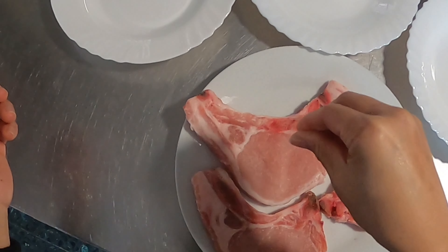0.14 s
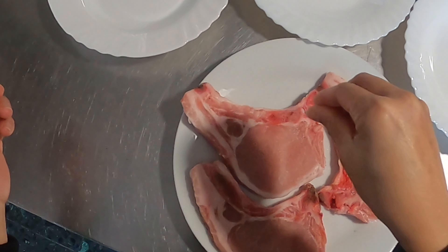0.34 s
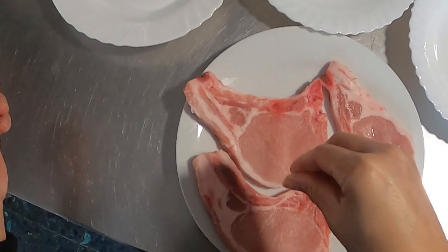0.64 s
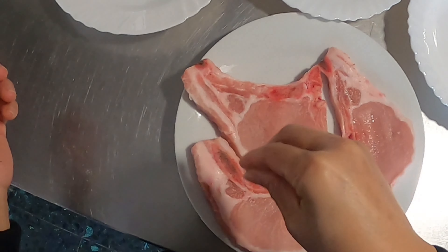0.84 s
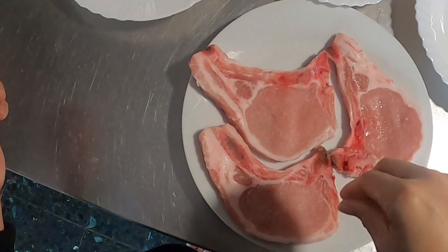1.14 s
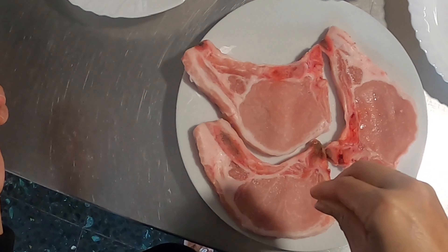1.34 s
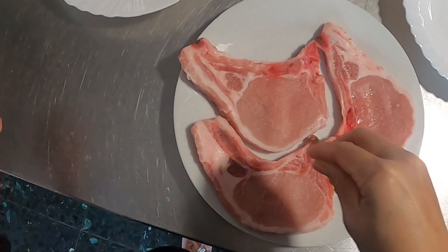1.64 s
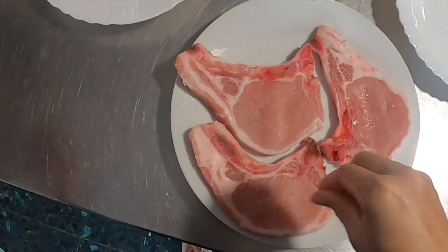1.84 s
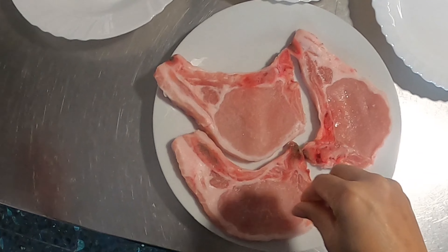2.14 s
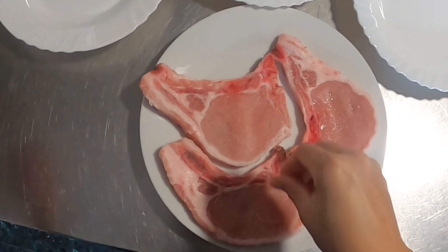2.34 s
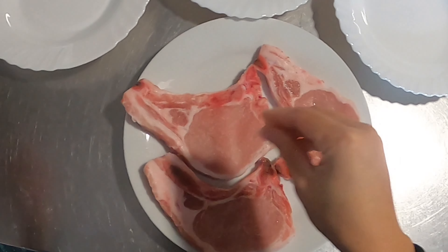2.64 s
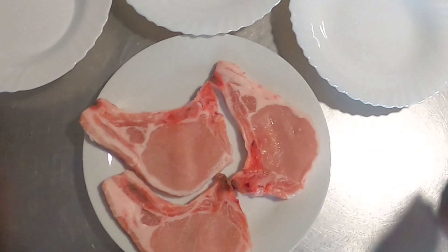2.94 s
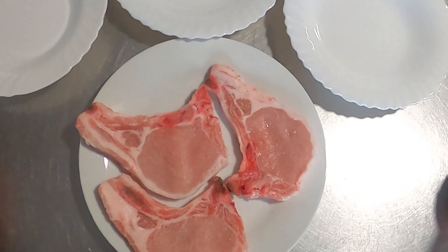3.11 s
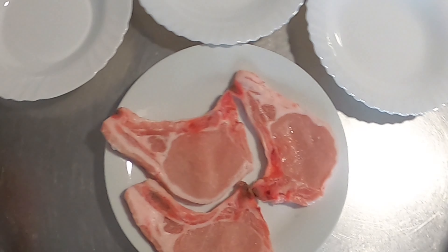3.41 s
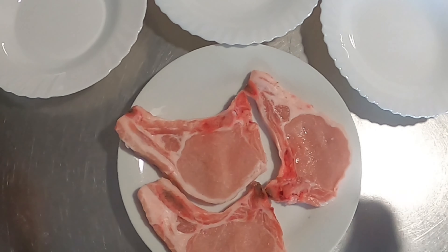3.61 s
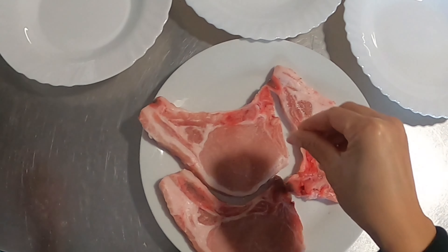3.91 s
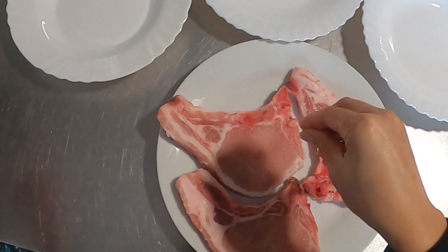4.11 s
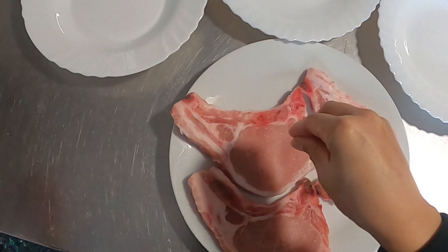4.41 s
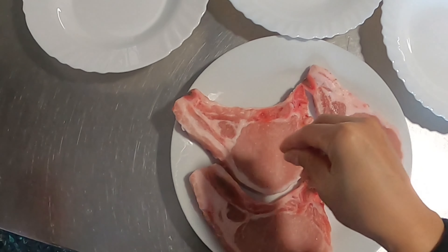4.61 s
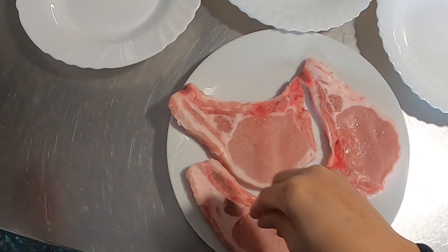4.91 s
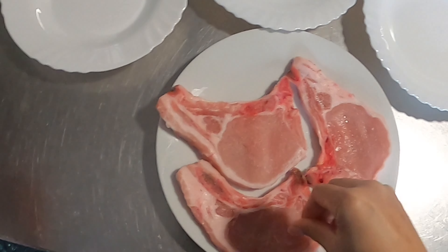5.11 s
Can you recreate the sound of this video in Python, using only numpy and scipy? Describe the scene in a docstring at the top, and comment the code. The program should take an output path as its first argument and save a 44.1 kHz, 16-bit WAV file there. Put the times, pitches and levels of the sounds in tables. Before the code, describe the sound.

A steady kitchen hiss and a low appliance hum, throbbing slowly, run throughout. From the very start, close to the microphone and slightly to the right, fingertips rub a pinch of salt over raw meat, about seven soft strokes a second. The crystals rasp on skin and fizz finely, with a few tiny sharp snaps in the first second. The strokes grow fainter and stop at about 3 seconds. At around 3.4 seconds a small metal thing clinks and chatters farther off, and something hollow is knocked down on a counter with a slight bounce. This knock is the loudest sound, and both echo briefly off the hard walls. Faint clinks continue until about 3.7 seconds. Near 3.9 seconds the salt rubbing resumes at the same pace, with a few snaps around 4.3 seconds, and softens toward the end at about 5.3 seconds.

```python
"""Kitchen hiss and a throbbing appliance hum, and at once, close to the microphone pair, fingertips
rubbing a pinch of salt over raw meat, seven strokes a second: crystals rasp on skin, fizz and snap.
While the hand is away, a small metal thing clinks and something hollow is knocked down on a counter,
both echoing off the hard walls. Then the rubbing resumes."""
import sys
import numpy as np
from scipy import signal
from scipy.fft import rfft, irfft
from scipy.io import wavfile
from scipy.ndimage import uniform_filter1d

SR = 44100
rng = np.random.default_rng(int(sys.argv[2]) if len(sys.argv) > 2 else 0)


def log_audio(samples):
    """Write samples as a 16-bit WAV file to the path given in sys.argv[1]."""
    # one column per channel
    frames = np.atleast_2d(samples).T
    # limit to full scale, then quantise
    limited = np.clip(frames, -1, 1)
    pcm = np.round(limited * 32767).astype(np.int16)
    wavfile.write(sys.argv[1], SR, pcm)


N = 231745


def gain_of(db):
    return 10 ** (np.asarray(db) / 20)


def unit_rms(x):
    return x / np.sqrt(np.mean(x ** 2) + 1e-20)


def curve_at(points, hz):
    """Reads (Hz, value) points along a log frequency axis."""
    freqs, values = np.transpose(points)
    return np.interp(np.log(hz + 1), np.log(freqs + 1), values)


def add(mix, start_s, sound):
    part = mix[..., round(start_s * SR):][..., :sound.shape[-1]]
    part += sound[..., :part.shape[-1]]


def colour(x, points):
    """Shapes the spectrum by (Hz, dB) points."""
    size = x.shape[-1]
    return irfft(rfft(x) * gain_of(curve_at(points, np.fft.rfftfreq(size, 1 / SR))), size)


def resonate(x, hz, width_hz):
    """A resonance that can glide: shifts hz down to zero, smooths, and shifts back."""
    turn = np.exp(2j * np.pi * np.cumsum(hz * np.ones(len(x))) / SR)
    pole = np.exp(-np.pi * width_hz / SR)
    return 2 * (turn * signal.lfilter([1 - pole], [1, -pole], x / turn)).real


def ring(modes, seconds):
    """Dying sines of a struck body; neighbouring modes start in opposite directions."""
    t = np.arange(round(seconds * SR)) / SR
    return sum((-1) ** k * gain_of(db - 60 * t / t60) * np.sin(2 * np.pi * hz * t)
               for k, (hz, db, t60) in enumerate(modes))


# How alike the room sounds at the two microphones: (frequency [Hz], correlation [0-1])
LIKENESS = [(60, 0.98), (200, 0.91), (700, 0.65), (1300, 0.47), (2400, 0.99), (4400, 0.51), (8000, 0.017)]
def mic_pair(a, b):
    """Two unrelated signals become left and right, alike in the bass, unrelated in the top treble."""
    same = np.clip(curve_at(LIKENESS, np.fft.rfftfreq(len(a), 1 / SR)), -1, 1)
    right = irfft(same * rfft(a) + np.sqrt(1 - same ** 2) * rfft(b), len(a))
    return np.array([a, right])


# Room tone all around the microphones, low and high: (frequency [Hz], relative density [dB])
RUMBLE = [(20, -2), (40, -4), (80, -10), (130, -4), (190, -7), (290, 0), (450, -9), (650, -14), (800, -35),
          (1200, -100)]
HISS = [(440, -32), (750, -4), (950, -5), (1300, 0), (1700, -3), (2400, -11.5), (3500, -13), (4800, -16),
        (5800, -16), (8000, -24), (10000, -31), (13000, -39), (15800, -48)]
def room_tone(spectrum, db):
    """Steady room noise whose spectrum drifts in faint patches."""
    hz, _, bands = signal.stft(mic_pair(*rng.standard_normal((2, N))), SR, nperseg=1024)
    patches = uniform_filter1d(rng.standard_normal(bands.shape[1:]), 12, axis=0)
    patches = unit_rms(uniform_filter1d(patches, 10, axis=1))
    bands = bands * gain_of(curve_at(spectrum, hz)[:, None] + 1.25 * patches)
    sides = signal.istft(bands, SR, nperseg=1024)[1][:, :N]
    return gain_of(db) * sides / np.std(sides.mean(0))


# Faint motor tones in the background, centred: (frequency [Hz], width [Hz], level [dB])
MOTOR_TONES = [(133.4, 5.5, -64.5), (247.1, 4.9, -72.5), (286.2, 2.9, -64.5), (311.8, 2.9, -68.5),
               (342.2, 3.4, -83)]
def appliances(throb_s=1.756, swell_at_s=1.542, waver_hz=1.19, flutter_db=1.4):
    """Two low hums throb together, each with its own flutter, beside wavering motor tones."""
    t = np.arange(N) / SR
    cycle = (t - swell_at_s) / throb_s % 1
    swell = np.abs(np.sin(np.pi * cycle ** 0.81)) ** 1.25  # rises faster than it fades
    throb = uniform_filter1d(swell + gain_of(-19.5), 4000)  # never quite silent
    hum = np.zeros(N)
    for hz, db in [(49.5, -48.5), (110, -58.5)]:
        drift = waver_hz * np.cumsum(unit_rms(uniform_filter1d(rng.standard_normal(N), 4000))) / SR
        flutter = unit_rms(uniform_filter1d(uniform_filter1d(rng.standard_normal(N), 2500), 2500))
        tone = np.sqrt(2) * np.sin(2 * np.pi * (hz * t + drift))
        hum += throb * gain_of(db + flutter_db * flutter) * tone
    for hz, width, db in MOTOR_TONES:
        narrow = resonate(rng.standard_normal(N), hz, width)
        hum += gain_of(db) * unit_rms(resonate(narrow, hz, 3 * width))
    return hum


# Salt heard close up, its rasp on skin and its fine fizz: (frequency [Hz], gain [dB])
RASP = [(900, -30), (2000, -14), (3300, -8), (4300, -8), (4900, -3), (7800, -4), (8800, -13), (15500, -42)]
FIZZ = [(5000, -20), (8500, -4), (10000, -2), (12500, -9), (14500, -16), (16000, -20)]
def salt_stroke(length, db, hollow_hz, fizz_db, gaps_hz, hollow_width_hz=1230, fizz_lag_s=.007):
    """Crystals slip between skin ridges in clumps; the hollow of the pinch colours them."""
    t = np.arange(round(3 * length * SR)) / SR - length
    # fine crystals break loose a little after the rasp starts
    pressure, loosening = (np.exp(-((t - lag) / (0.68 * length) - .74) ** 2) for lag in (0, fizz_lag_s))
    clumps = gain_of(3.7 * unit_rms(uniform_filter1d(rng.standard_normal(len(t)), 150)))
    slips = rng.standard_normal((2, len(t))) * clumps
    coarse, fine = slips * gain_of(2.5 * np.minimum(rng.exponential(1, slips.shape), 5))
    closing = 1 + .05 * (t / length - .5)  # the hollow shrinks as the thumb slides
    hollow = resonate(coarse, hollow_hz * closing, hollow_width_hz)
    hollow = unit_rms(resonate(hollow, hollow_hz * closing, hollow_width_hz))
    upper = unit_rms(resonate(coarse, hz=7480, width_hz=650))
    rasp = unit_rms(hollow + gain_of(-10) * upper + gain_of(3.5) * unit_rms(colour(coarse, RASP)))
    trickle = gain_of(-17.5) * np.hanning(len(t)) ** .5  # loose crystals keep falling
    gaps = sum(resonate(fine, hz * closing, 650) for hz in gaps_hz)  # small gaps between the fingers
    fizz = unit_rms(colour(unit_rms(fine) + gain_of(3) * unit_rms(gaps), FIZZ))
    return gain_of(db) * (pressure * rasp + (loosening + trickle) * gain_of(fizz_db) * fizz)


# Finger strokes over the meat, close and a little to the right:
# (time [s], length [s], level [dB], hollow of the pinch [Hz], fizz against rasp [dB])
STROKES = [(0.012, 0.046, -58, 5300, -15.5), (0.148, 0.049, -59, 5160, -16.5),
           (0.277, 0.043, -60, 5150, -14), (0.412, 0.052, -60, 5760, -10), (0.545, 0.047, -61.5, 5600, -10),
           (0.688, 0.053, -60.5, 5600, -14), (0.829, 0.039, -62, 6360, -12.5),
           (0.965, 0.042, -58, 5480, -22), (1.097, 0.04, -60, 5970, -14), (1.24, 0.053, -62.5, 6340, -21),
           (1.384, 0.038, -61, 5200, -14), (1.529, 0.056, -61.5, 6140, -16),
           (1.665, 0.053, -65, 6100, -11.5), (1.811, 0.067, -64, 5960, -12), (1.932, 0.064, -66, 5300, -10),
           (2.088, 0.066, -71.5, 5700, -6.5), (2.231, 0.053, -68.5, 4870, -8.5),
           (2.37, 0.086, -73.5, 5900, -6), (2.55, 0.057, -73, 6220, -4.5),
           (2.707, 0.083, -68.5, 5170, -6.5), (2.92, 0.05, -81, 4790, -6), (3.939, 0.052, -61, 5240, -28),
           (4.102, 0.046, -62, 5490, -13.5), (4.243, 0.057, -56, 5440, -23), (4.396, 0.032, -58, 6220, -20),
           (4.527, 0.049, -57.5, 5670, -12.5), (4.663, 0.041, -61.5, 6800, -12),
           (4.809, 0.061, -59, 6850, -11.5), (4.945, 0.047, -60.5, 5600, -10),
           (5.096, 0.054, -63.5, 5800, -11), (5.236, 0.064, -69.5, 5640, -7)]
# Single crystals snapping, close and centred: (time [s], level [dB], pitch [Hz])
SNAPS = [(0.168, -43, 1230), (.651, -45.5, 4730), (0.731, -43, 5750), (.987, -41, 5400), (.998, -46, 5100),
         (2.948, -55, 6050), (3.022, -61, 8000), (4.259, -47, 5400), (4.267, -40, 5300), (4.279, -45, 5170)]
def salting(left_minus_right_db=-4, snap_decay_s=0.0012):
    """Fingertips rub salt and crack the odd crystal; the walls answer softly."""
    near, to_walls = np.zeros((2, N + SR)), np.zeros(N + SR)  # 1 s of lead-in for the first stroke
    pan = gain_of([[left_minus_right_db / 2], [-left_minus_right_db / 2]])
    for s, length, db, hollow_hz, fizz_db in STROKES:
        gaps_hz = rng.uniform(8440, 12900, 3)
        mid = salt_stroke(length, db, hollow_hz, fizz_db, gaps_hz)
        # each microphone faces another side of the pinch
        side = gain_of(-1.5) * salt_stroke(length, db, hollow_hz, fizz_db, gaps_hz)
        add(near, s + 1 - length, pan * np.array([mid + side, mid - side]))
        add(to_walls, s + 1 - length, mid)
    t = np.arange(400) / SR
    envelope = np.exp(-t / snap_decay_s) * np.minimum(t / 0.0001, 1)
    for s, db, hz in SNAPS:
        snap = gain_of(db) * np.sin(2 * np.pi * hz * t) * envelope
        add(near, s + 1, snap[None])
        add(to_walls, s + 1, snap)
    return near[:, SR:] + gain_of(-5) * walls(to_walls[SR:], decay_scale=0.72)


# Reverberation of the hard-walled kitchen: (frequency [Hz], unscaled 60 dB decay [s])
WALL_DECAY = [(60, 0.26), (200, 0.82), (500, 0.46), (1200, 0.72), (2500, 0.75), (5000, 0.46), (9000, 0.45),
              (15000, 0.32)]
def walls(x, decay_scale=1):
    """Sparse reflections of random sign, each band dying at its own speed."""
    taps = np.zeros((2, SR))
    arrivals = np.arange(100, SR - 20, 20) + rng.integers(0, 20, (2, (SR - 101) // 20))
    np.put_along_axis(taps, arrivals, rng.choice([-1., 1.], arrivals.shape), 1)
    hz, t, bands = signal.stft(mic_pair(*taps), SR, nperseg=256)
    t60 = decay_scale * curve_at(WALL_DECAY, hz)[:, None]
    tail = signal.istft(bands * gain_of(-60 * t / t60), SR, nperseg=256)[1]
    return signal.fftconvolve(x[None], tail / np.linalg.norm(tail[0]), axes=1)[:, :N]


# A small metal thing chattering on its rest, out in the room: (time [s], strength [dB], decay [s])
CLINKS = [(3.3645, -59.5, 0.0077), (3.376, -51.5, 0.013), (3.394, -53.5, 0.0042), (3.403, -59, 0.0058),
          (3.429, -50, 0.0068), (3.445, -71, 0.018), (3.59, -59.5, 0.028), (3.62, -66.5, 0.0065),
          (3.634, -58, 0.0069), (3.68, -61, 0.015), (3.74, -66, 0.037)]
# Its modes: (frequency [Hz], relative level [dB], 60 dB decay [s])
METAL_MODES = [(2215, -5, .08), (5190, -13, .05), (5528, 0, .08), (5612, -5, .06), (5900, -17, .05),
               (7300, -30, .06), (8540, -30, .06), (9470, -21, .08), (10670, -27, .08), (12600, -36, .06)]
def metal_clinks():
    """Bursts of tiny contacts rasp and ring the metal, heard directly and off the walls."""
    contacts = np.zeros(N)
    for s, db, decay_s in CLINKS:
        burst = rng.standard_normal(4000) * np.exp(-np.arange(4000) / (decay_s * SR))
        add(contacts, s, gain_of(db) * burst / np.linalg.norm(burst))
    ringing = signal.fftconvolve(contacts, ring(METAL_MODES, seconds=.6))[:N]
    direct = ringing + gain_of(25.5) * colour(contacts, RASP)
    return gain_of(9.5) * direct + gain_of(8) * walls(direct)


# A hollow thing landing and bouncing, shadowed from the microphones: (time [s], strength [dB])
KNOCKS = [(3.4414, -33), (3.444, -14), (3.4635, -30.5)]
# The crack of each blow, at the counter: (frequency [Hz], relative level [dB])
CRACK = [(40, -28), (120, -12.5), (300, -14), (600, -8.5), (1100, -10), (2000, -15), (3200, -24),
         (5600, -29), (9000, -45), (12000, -49.5), (15500, -80)]
# The counter's modes: (frequency [Hz], relative level [dB], 60 dB decay [s])
COUNTER_MODES = [(83, -20, .6), (135, -8, .5), (182, -7, .45), (310, -11, .43), (353, -14, .4),
                 (371, -13, .48), (436, -6, .34), (450, -2, .45), (511, -10, .3), (528, -8, .3),
                 (599, -12, .4), (751, -12, .45), (935, -14, .5), (976, -4, .42), (1032, -7, .5),
                 (1069, -10, .5), (1110, -13, .5), (1234, -14, .5), (1320, -16, .5), (1412, -13, .5),
                 (1567, -20, .5), (1873, -9, .2)]
def counter_knock():
    """Hard blows ring the counter; the crack's treble arrives by way of the walls."""
    blows = np.zeros(N)
    for s, db in KNOCKS:
        blows[round(s * SR)] += gain_of(db)
    hz = np.linspace(0, SR / 2, 1025)
    power = gain_of(2 * curve_at(CRACK, hz))  # minimum_phase takes the square root
    pulse = signal.minimum_phase(signal.firwin2(2047, hz, power, fs=SR))
    crack = signal.fftconvolve(blows, pulse / np.abs(pulse).max())[:N]
    shadowed = signal.sosfilt(signal.butter(2, [350, 2600], "band", fs=SR, output="sos"), crack)
    body = signal.fftconvolve(blows, ring(COUNTER_MODES, seconds=0.93))[:N]
    return gain_of(10.5) * shadowed + gain_of(11.5) * walls(crack) + gain_of(-9.5) * body


def scene():
    """The kitchen as it reaches the microphones."""
    room = room_tone(RUMBLE, db=-58) + room_tone(HISS, db=-66.5)
    return salting() + metal_clinks() + counter_knock() + appliances() + room


# Balance of the microphone pair: (frequency [Hz], left minus right [dB])
MIC_BALANCE = [(60, 1.5), (110, 2), (200, 2), (380, -1), (700, 0.5), (1290, 1.5), (2380, 6.5), (4400, 0.5),
               (8120, 0), (15000, 2.5)]
def record(dry, cutoff_hz=15650):
    """The pair leans left or right with pitch, the left two samples late; the top treble is cut."""
    lean_db = curve_at(MIC_BALANCE, np.fft.rfftfreq(N, 1 / SR)) / 2
    left, right = irfft(rfft(dry) * gain_of([lean_db, -lean_db]), N)
    lowpass = signal.firwin(511, cutoff_hz, window=("kaiser", 9), fs=SR)
    return signal.oaconvolve(np.array([np.roll(left, 2), right]), lowpass[None], "same")


dry = scene()
out = record(dry)
log_audio(out)
```